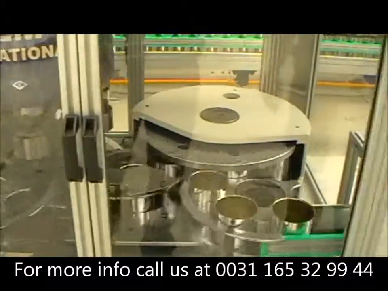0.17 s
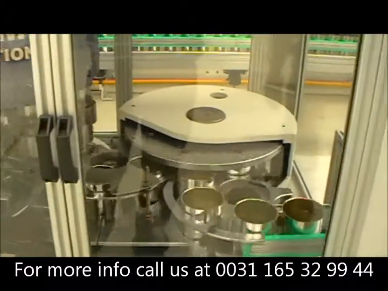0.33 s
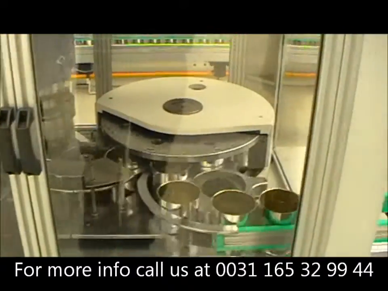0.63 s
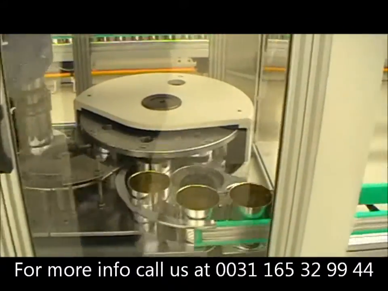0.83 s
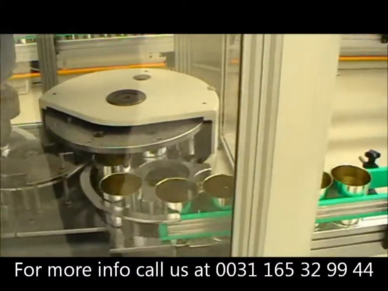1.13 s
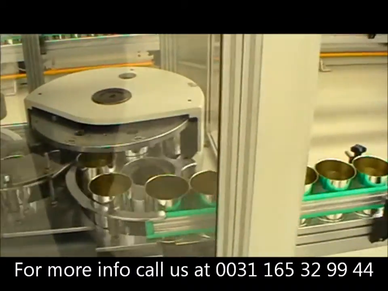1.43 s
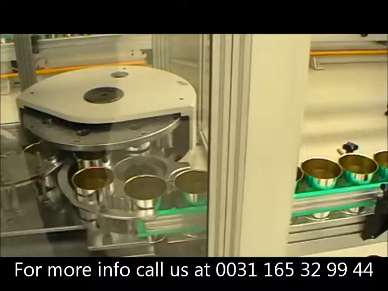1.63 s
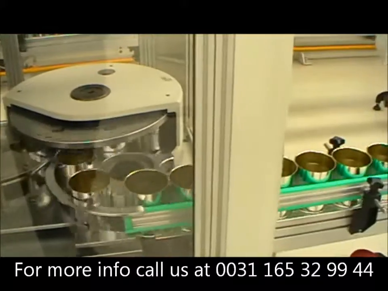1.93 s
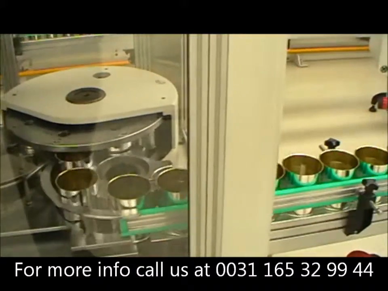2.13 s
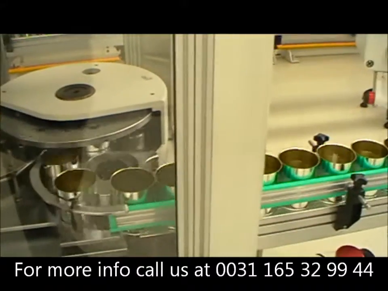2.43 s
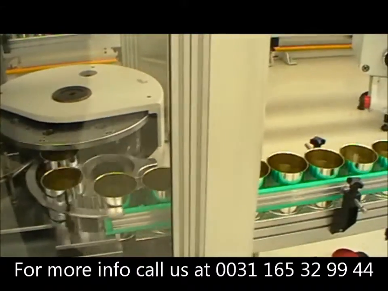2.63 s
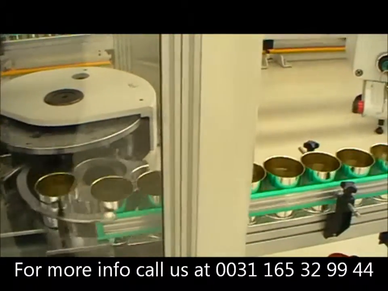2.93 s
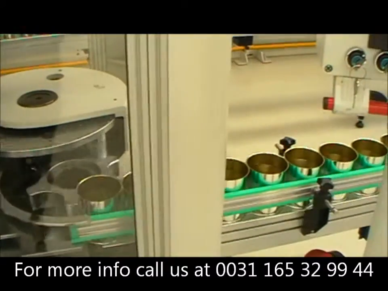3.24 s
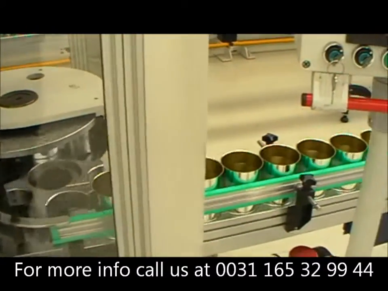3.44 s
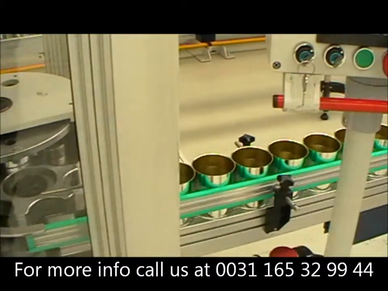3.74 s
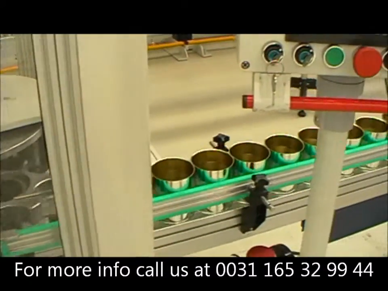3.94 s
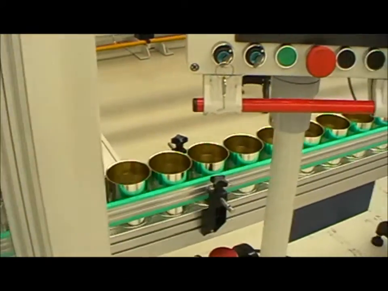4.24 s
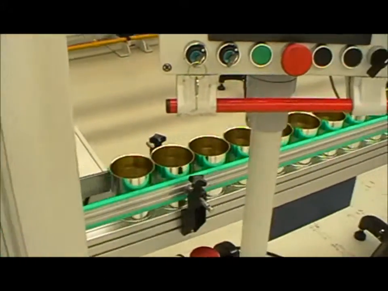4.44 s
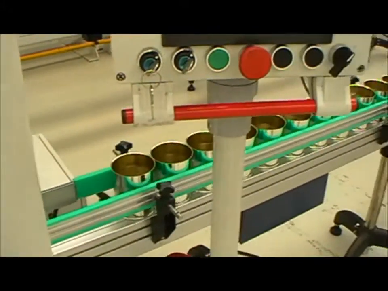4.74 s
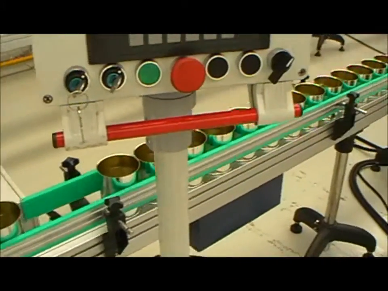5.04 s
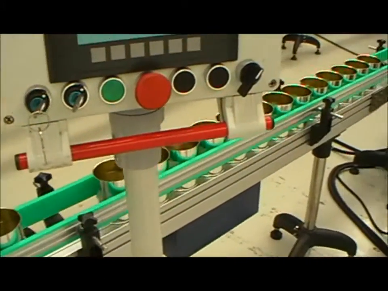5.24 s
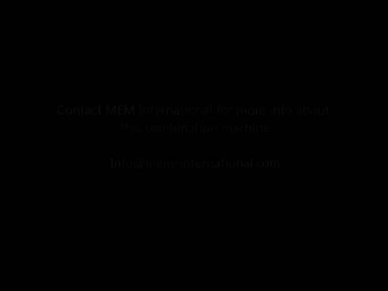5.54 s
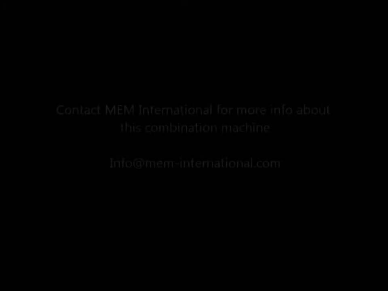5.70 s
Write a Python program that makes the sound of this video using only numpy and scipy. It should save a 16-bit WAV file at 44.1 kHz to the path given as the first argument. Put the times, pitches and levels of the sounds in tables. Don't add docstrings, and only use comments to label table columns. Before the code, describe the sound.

Inside a busy factory hall, a microphone carried along a can line picks up wavering high motor whine, whistling air leaks, low fan hum and distant machine roar. Tinplate cans rattle constantly, with bright hard knocks bunching in the first half. Later come dull rail thuds and a short burst of compressed air, until the sound stops dead near the end.

```python
import sys
import numpy as np
from scipy import signal
from scipy.fft import rfft, irfft, next_fast_len
from scipy.io import wavfile
from scipy.ndimage import uniform_filter1d

SR = 44100
rng = np.random.default_rng(int(sys.argv[2]) if len(sys.argv) > 2 else 0)


def to_linear_factor(level_db):
    exponent = np.asarray(level_db, float) / 20
    return 10 ** exponent


def int16_out(signal):
    q = np.round(np.clip(np.atleast_2d(signal).T, -1, 1) * 32767)
    wavfile.write(sys.argv[1], SR, q.astype(np.int16))


N = 258867
CUT_S = 5.4405


def rms_one(x):
    return x / np.sqrt(np.mean(x ** 2) + 1e-20)


def in_time(rows):
    s, *columns = np.transpose(rows)
    return [np.interp(np.arange(N) / SR, s, c) for c in columns]


def at_hz(points, hz):
    table_hz, table_db = np.array(points).T
    return np.interp(np.log(hz), np.log(table_hz), table_db)


def drift(rate):
    r = np.exp(-80 * np.pi * rate / SR)
    slow = signal.lfilter([1], [1, -2 * r, r * r], rng.standard_normal(N // 40 + 4002))[4000:]
    return np.interp(np.arange(N) / 40, np.arange(len(slow)), rms_one(slow))


def resonate(x, hz, width):
    r = np.exp(-np.pi * width / SR)
    poles = [1, -2 * r * np.cos(2 * np.pi * hz / SR), r * r]
    return signal.lfilter([(1 - r * r) / 2, 0, (r * r - 1) / 2], poles, x)


# f/Hz, level/dB
SIDE_WIDTH = [(40, -10), (70, -17), (140, -25.5), (290, -25.5), (640, -18.5), (1400, -14.5), (3100, -14.5),
              (6000, -17), (8500, -11.5), (11000, 2.5), (13500, -2.5), (15500, -13.5)]
# f/Hz, level/dB
BALANCE = [(60, 1.5), (180, 0.5), (550, 1.0), (1650, 0.5), (4970, -1.5), (15000, -1.5)]


def stereo(mid, side, hz):
    pair = mid + to_linear_factor(at_hz(SIDE_WIDTH, hz)) * side * np.array([[1], [-1]])
    return pair * to_linear_factor(at_hz(BALANCE, hz) * np.array([[.5], [-.5]]))


def tone(hz, level_db, start):
    t = np.arange(N) / SR
    walking = np.interp(t, [3.1, 3.5], [1.7, .35])
    phase = 2 * np.pi * hz * t + start + walking * drift(1.0)
    return stereo(np.sin(phase), .5 * np.cos(phase), hz) * np.sqrt(2) * to_linear_factor(level_db)


def narrow_noise(hz, width, level_db):
    white = rng.standard_normal((2, N))
    mid, side = resonate(resonate(white, hz, width * 1.36), hz, width * 1.36)
    return stereo(rms_one(mid), rms_one(side), hz) * to_linear_factor(level_db)


SUPPLY_HZ, SHAFT_HZ = 55.17, 54.52
LOW_CARRIER_HZ, MID_CARRIER_HZ, HIGH_CARRIER_HZ = 5000.6, 7473.5, 10001.2
LOW_STRONG = [(-1, 0), (0, 0), (1, 0)]
SLOT_STRONG = [(0, -8), (0, 8)]
MID_STRONG = [(-2, 0), (-1, 0), (0, 0), (2, 0)]
# t/s, level/dB, lean to the upper lines/dB per step
LOW_HEARD = [(0, -25.5, 6), (.2, -39, 2.5), (.5, -26, -1), (.7, -32.5, 2), (.8, -28, -5), (.98, -34, -9),
             (1.39, -27.5, 2.5), (1.68, -29.5, 3), (2.7, -30, 1), (3.0, -28.5, -2.5), (3.21, -31.5, -5),
             (3.98, -23, 2.5), (4.11, -28, 9), (4.26, -33, 2.5), (4.82, -33, 9), (5.03, -28, 9),
             (5.4, -25, 4.5)]
SLOT_HEARD = [(0, -31.5, -2), (.29, -39.5, -8.5), (.68, -33.5, -4), (.92, -35.5, -4.5), (1.12, -32, -4),
              (1.59, -39, -9.5), (2.17, -40, -13), (2.36, -33.5, -3.5), (3.23, -37.5, -3), (3.5, -36, -2),
              (3.91, -24, 1.5), (4.26, -31, 3), (4.76, -25.5, 1.5), (5.0, -29.5, 2), (5.4, -34.5, -4)]
MID_HEARD = [(0, -34.5, -0.5), (.3, -43.5, -0.5), (.8, -39, -2.5), (1.41, -53, 5), (1.79, -38.5, -0.5),
             (2.5, -45.5, 4), (3.03, -33.5, 2), (3.17, -36.5, 0.5), (3.35, -33.5, 2.5), (3.47, -36, 1),
             (4.15, -33, 2.5), (4.5, -38, 1), (4.82, -35, 2), (5.4, -34, 0)]
# supply multiple, shaft multiple; then one level/dB for each
LOW_WEAK = [(-1, -8), (0, -4), (1, -4), (2, 0), (-1, 4), (0, 4), (1, 8), (2, 8), (3, 8)]
LOW_WEAK_DB = [-43, -40, -37.5, -57.5, -52, -55.5, -54, -50, -46]
MID_WEAK = [(-1, -8), (1, -8), (2, -8), (-4, 0), (1, 0), (3, 0), (5, 0), (0, 8), (2, 8), (3, 8)]
MID_WEAK_DB = [-48, -41, -57, -55.5, -59, -56.5, -53, -41.5, -47, -47.5]
HIGH_WEAK = [(-2, 0), (-1, 0), (0, 0), (2, 0), (3, 0), (4, 0), (6, 0), (0, 8), (3, 8)]
HIGH_WEAK_DB = [-60, -61, -56.5, -61, -50.5, -63, -61, -61.5, -57.5]


def drives():
    strong = [(LOW_CARRIER_HZ, LOW_STRONG, LOW_HEARD), (LOW_CARRIER_HZ, SLOT_STRONG, SLOT_HEARD),
              (MID_CARRIER_HZ, MID_STRONG, MID_HEARD)]
    weak = [(LOW_CARRIER_HZ, LOW_WEAK, LOW_WEAK_DB), (MID_CARRIER_HZ, MID_WEAK, MID_WEAK_DB),
            (HIGH_CARRIER_HZ, HIGH_WEAK, HIGH_WEAK_DB)]
    out = 0
    for carrier, lines, heard in strong:
        cluster_db, lean_db = in_time(heard)
        for m, n in lines:
            own_fade_db = 1.4 * drift(2.4)
            level_db = cluster_db + lean_db * (m + np.sign(n)) + own_fade_db
            start = 0 if lines is LOW_STRONG else rng.uniform(0, 2 * np.pi)
            out = out + tone(carrier + m * SUPPLY_HZ + n * SHAFT_HZ, level_db, start)
    for carrier, lines, levels in weak:
        for (m, n), level_db in zip(lines, levels):
            hz = carrier + m * SUPPLY_HZ + n * SHAFT_HZ
            out = out + tone(hz, level_db + 2.0 * drift(1.3), rng.uniform(0, 2 * np.pi))
    return out


# peak t/s, rattle rise/dB, build-up/s, dying/s
JOLTS = [(1.135, 1, .015, .03), (1.52, 2.5, .03, .04), (1.8, 4, .1, .07), (2.07, 7, .08, .08),
         (2.26, 10.5, .03, .07), (2.58, 6.5, .1, .1), (2.799, 16.5, .018, 0.049), (3.12, 8.5, .12, .02),
         (3.34, 15, 0.033, .022), (4.185, 13.5, .025, .13), (4.35, 7, .015, .05), (4.91, 2, .03, .015)]


def jolts():
    s, rise_db, build, dying = np.transpose(JOLTS)[:, :, None]
    age = np.arange(N) / SR - s
    return np.sum(rise_db * np.exp(-np.abs(age) / np.where(age < 0, build, dying)), axis=0)


# t/s, level/dB
RATTLE = [(0, -44.5), (.4, -39), (.9, -40), (1.2, -41), (2.2, -44), (3.1, -38.5), (3.4, -46), (4.2, -42.5),
          (4.5, -45.5), (4.85, -41), (5.4, -46.5)]
# t/s, level/dB, favoured ring f/Hz, length/s
KNOCKS = [(0.13, -9.5, 2198, .012), (0.143, -10.5, 3200, 0.013), (.174, -12.5, 2200, 0.008),
          (1.127, -15.5, 8040, .0064), (1.192, -14, 8480, .0069), (1.330, -11.5, 3880, .01),
          (1.520, -4, 5060, .011), (1.777, -23.5, 7210, .0085), (1.857, -10, 4380, .008),
          (2.050, -3, 4440, .014), (2.085, -22, 4460, .0082), (2.257, -7, 5380, .014),
          (2.280, -15, 4390, .027), (2.308, -14, 3810, .023), (2.557, -7.5, 4370, .01),
          (2.584, -18.5, 3690, .009), (2.793, -1.5, 4630, 0.014), (2.821, -16.5, 4490, 0.031),
          (2.960, -14.5, 6900, .034), (3.054, -16.5, 4420, .02), (3.098, -6.5, 4390, .01),
          (3.116, -7, 4300, .013), (3.332, -16, 6150, .012), (3.339, -9.5, 5000, .019),
          (3.407, -11, 4370, .011), (4.165, -17, 3120, .04), (4.225, -14.5, 2970, .03),
          (4.365, -19.5, 3260, .015), (4.555, -19.5, 3100, .011), (4.900, -22, 6500, .0063)]
# f/Hz, level/dB
TIN = [(1500, -3.5), (3000, -5.5), (4500, -5.5), (6500, -5), (9000, -14.5), (11500, -23.5), (15000, -32)]


def cans():
    jolt_db = jolts()
    rattle_db = in_time(RATTLE)[0] + jolt_db
    bright = np.minimum(1.07 + .35 * jolt_db, 4)
    s, level_db, ring_hz, length = np.transpose(KNOCKS)[:, :, None]
    age = np.arange(6000) / SR / length
    scuffs = np.minimum(9 * age, 1) * np.exp(-age)
    at = (s * SR).astype(int) + np.arange(6000)
    pitches = np.geomspace(1500, 15500, 44) * to_linear_factor(rng.normal(0, 0.19, 44))
    spread_db = rng.normal(0, 0.73, (len(s), 44))
    clump = to_linear_factor(rattle_db + 2.0 * drift(39))
    out = 0
    for k, hz in enumerate(pitches):
        drive = clump * to_linear_factor(bright * np.log2(hz / 11000) + 42)
        away = np.log2(hz / np.array([ring_hz, 1.9 * ring_hz]))
        near_db = 7.7 * np.exp(-(away / 0.11) ** 2) + 11.1 * np.exp(-(away / 0.26) ** 2)
        near_db = np.maximum(near_db[0], 0.57 * near_db[1])
        np.add.at(drive, at, scuffs * to_linear_factor(level_db + near_db + spread_db[:, k:k + 1] + 11.5))
        hits = rng.random((2, N)) < 1600 / SR
        touches = hits * rng.standard_normal((2, N)) * drive
        ring = resonate(resonate(touches + 1e-18, hz, 0.03 * hz), hz, 0.22 * hz)
        mid, side = ring * to_linear_factor(at_hz(TIN, hz))
        out = out + stereo(mid, side, hz)
    return out


# t/s, level/dB, f/Hz, length/s
THUDS = [(.138, -28.5, 1000, 0.04), (.15, -28, 1400, 0.15), (3.397, -25, 1010, 0.084),
         (3.974, -29.5, 808, 0.17), (3.967, -33, 950, 0.12), (4.05, -30, 962, 0.17),
         (4.135, -28, 805, 0.13), (4.137, -19.5, 1940, .04), (4.696, -27, 960, .07),
         (4.81, -26.5, 830, .09), (4.816, -30.5, 1120, 0.091), (4.883, -21.5, 970, 0.075),
         (5.042, -28.5, 1035, 0.086)]


def rail():
    out, t = 0, np.arange(N) / SR
    for s, level_db, hz, length in THUDS:
        age = np.clip(t - s, 0, None) / length
        width = .45 * hz * np.clip(0.048 / length, .1, 1) ** 2.2
        if hz > 1300:
            width += hz / 2
        out = out + narrow_noise(hz, width, level_db) * np.minimum(8 * age, 1) * np.exp(-age ** 2)
    return out


# t/s, level/dB, hold/s
PUFFS = [
    (4.153, -19, .065),
    (4.35, -31, .04),
]


def valve():
    s, level_db, hold = np.transpose(PUFFS)[:, :, None]
    age = np.arange(N) / SR - s
    attack_s, fall_db_per_s = .035, 95
    fall_db = fall_db_per_s * np.clip(age - hold, 0, None)
    puffs = np.clip(age / attack_s, 0, 1) * to_linear_factor(level_db - fall_db)
    band = signal.butter(2, (5200, 8200), "band", fs=SR, output="sos")
    mid, side = signal.sosfilt(band, rng.standard_normal((2, N)))
    return stereo(rms_one(mid), rms_one(side), 8200) * puffs.max(axis=0) * to_linear_factor(1.2 * drift(45))


# t/s, whistle swing level/dB
AIR = [(0, 0.5), (.27, -3), (.77, 0.5), (.98, -5), (1.06, -1.5), (1.83, 2), (2.3, -1), (2.78, 1), (3.23, 1),
       (3.33, 3), (3.53, -0.5), (3.62, 2), (4.15, 1.5), (4.24, -6), (4.45, -1), (4.77, 1.5), (4.91, -1),
       (5.35, 2.5)]
# f/Hz, width/Hz, level/dB, share of the pressure swing followed
LOUD_WHISTLES = [(2254, 83, -30, .9), (3655, 52, -28.5, 1.2), (5911, 141, -20, 0.88),
                 (8860, 118.5, -34.5, 1.1)]
# f/Hz, width/Hz, level/dB
WHISTLES = [(8200, 40, -57.5), (5000, 690, -28), (7480, 480, -32.5), (12450, 150, -55), (13320, 130, -57),
            (14120, 150, -55.5), (13200, 1600, -57.5)]


def air_jets():
    air_db, = in_time(AIR)
    out = 0
    for hz, width, level_db in WHISTLES:
        out = out + narrow_noise(hz, width, level_db + 0.38 * drift(17.0))
    for hz, width, level_db, follows in LOUD_WHISTLES:
        swell_db = follows * air_db + 1.13 * drift(1.1)
        out = out + narrow_noise(hz, width, level_db + swell_db + 0.38 * drift(17.0))
    return out


# t/s, level/dB, also used by hall()
RUMBLE = [(0, -22.5), (.17, -27), (.77, -24.5), (1.71, -26.5), (1.83, -26), (2.7, -24), (3.3, -26),
          (3.93, -25.5), (4.15, -25.5), (4.3, -33.5), (4.69, -25), (5.09, -27.5), (5.3, -25)]
# f/Hz, width/Hz, level/dB
HUMS = [(57.6, 3, -58.5), (160.7, 21, -32), (274.7, 44, -31), (490.7, 8.9, -37), (628, 47, -38.5)]
BLADE_DB = [-35, -31, -35.5, -42, -61, -42, -45.5]


def fan_and_hums():
    rumble_db, = in_time(RUMBLE)
    swing_db = rumble_db - rumble_db.mean()
    blade_hz = 93.04
    blades = [((k + 2) * blade_hz, 8.0, level_db) for k, level_db in enumerate(BLADE_DB)]
    out = tone(59.2, -49.5 + swing_db + 1.5 * drift(3.0), 0)
    for hz, width, level_db in HUMS + blades:
        out = out + narrow_noise(hz, width, level_db + 0.54 * swing_db + 0.38 * drift(17.0))
    return out


# f/Hz, level/dB per Hz
HALL = [(36, -26.5), (80, -15), (110, -5), (170, -2.5), (330, -1), (520, -6.5), (1000, -7), (1800, -11.5),
        (3200, -10.5), (6500, -22.5), (9000, -22.5), (10500, -38.5), (12000, -45), (15500, -43.5)]


def hall(patchy_db):
    rumble_db, = in_time(RUMBLE)
    roar_db = -29.5 - rumble_db + 0.15 * (rumble_db - rumble_db.mean())
    out, together = 0, drift(3.9)
    edges = 36 * 2 ** np.arange(0, 9, .4)
    white = rng.standard_normal((2, 2, N))
    for k, (low, high) in enumerate(zip(edges, edges[1:])):
        band = signal.butter(2, [low, high], "band", fs=SR, output="sos")
        mid, side = signal.sosfilt(band, white[k % 2])
        hz = np.sqrt(low * high)
        share = np.clip(np.log2(hz / 300), 0, 1)
        flicker_db = patchy_db * (1.0 * together + drift(5.1))
        out = out + stereo(mid, side, hz) * to_linear_factor(at_hz(HALL, hz) + share * roar_db + flicker_db)
    return out * to_linear_factor(rumble_db + 21.5)


def scene():
    return drives() + cans() + rail() + valve() + air_jets() + fan_and_hums() + hall(patchy_db=1.0)


# low f/Hz, high f/Hz, share of the time silent
GATED_BANDS = [(10900, 11300, .1), (11300, 11700, .16), (11700, 12100, .14), (14350, 14800, .55),
               (14800, 15200, .66), (15200, 16000, .92)]


def gate_treble(x):
    size = next_fast_len(N)
    spectrum, hz = rfft(x, size), np.fft.rfftfreq(size, 1 / SR)
    out = x.copy()
    for low, high, share in GATED_BANDS:
        band = irfft(spectrum * ((hz > low) & (hz <= high)), size)[:, :N]
        power = uniform_filter1d(np.mean(band ** 2, axis=0), size=1400)
        weak = power < np.quantile(power[:int(CUT_S * SR)], share)
        out -= band * uniform_filter1d(weak * 1., size=512)
    return out


def roll_off(x):
    return signal.sosfilt(signal.butter(12, 15640, fs=SR, output="sos"), x)


def record(dry):
    t = np.arange(N) / SR
    duck_over_db, duck_share, recover_db_per_s = -13.5, 0.66, 20.5
    level_db = 10 * np.log10(uniform_filter1d(np.mean(dry ** 2, axis=0), size=441) + 1e-12)
    recovery_db = recover_db_per_s * t
    held_db = np.maximum.accumulate(level_db + recovery_db) - recovery_db
    duck_db = uniform_filter1d(-duck_share * np.clip(held_db - duck_over_db, 0, None), size=441)
    smear_db = np.interp(t - CUT_S, [0, .014, .021, .04, .045], [-19.5, -33, -71, -72, -140])
    tail_db = np.where(t < CUT_S, 0, smear_db)
    clipped = np.tanh(dry * to_linear_factor(duck_db) / 1.53) * 1.678
    mix = gate_treble(clipped) * to_linear_factor(tail_db)
    return roll_off(mix)


dry = scene()
out = record(dry)
int16_out(out)
```